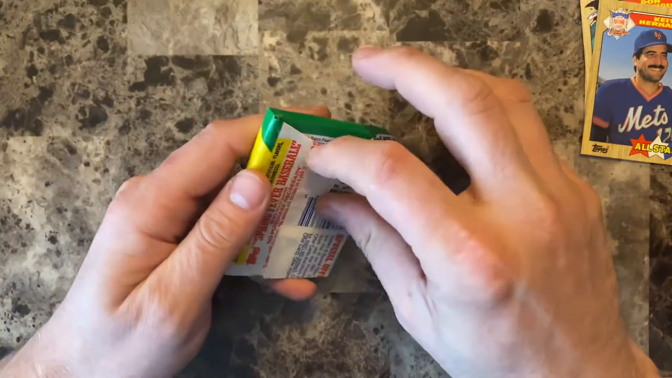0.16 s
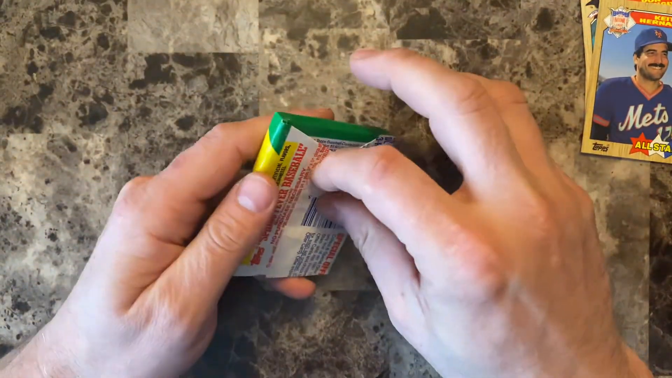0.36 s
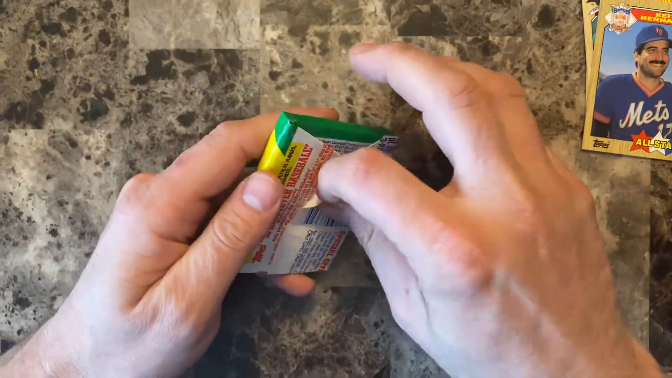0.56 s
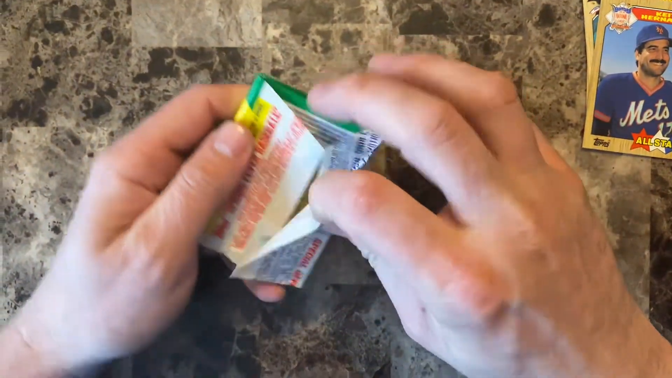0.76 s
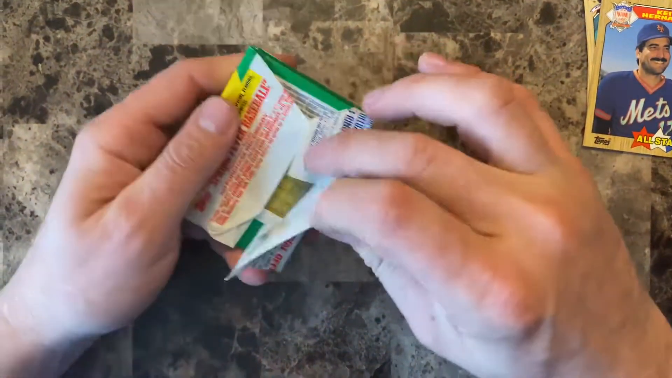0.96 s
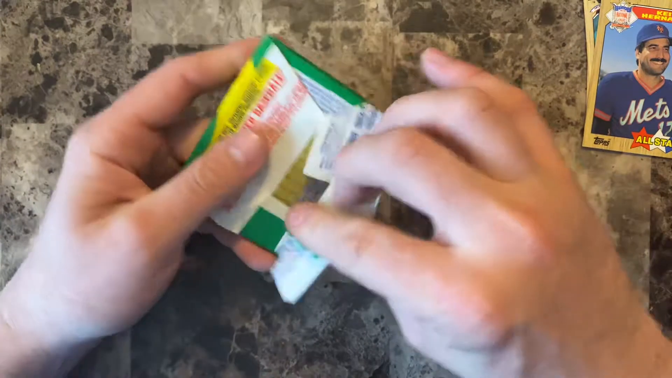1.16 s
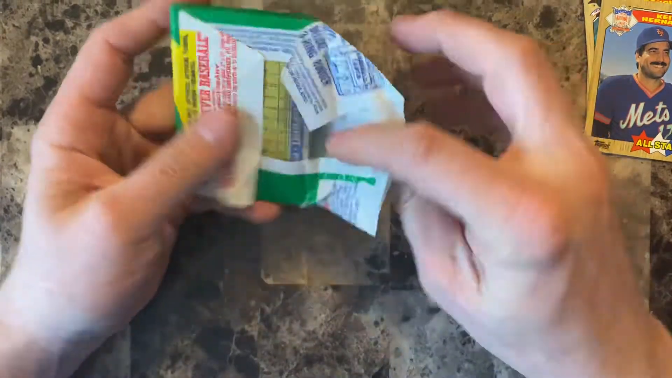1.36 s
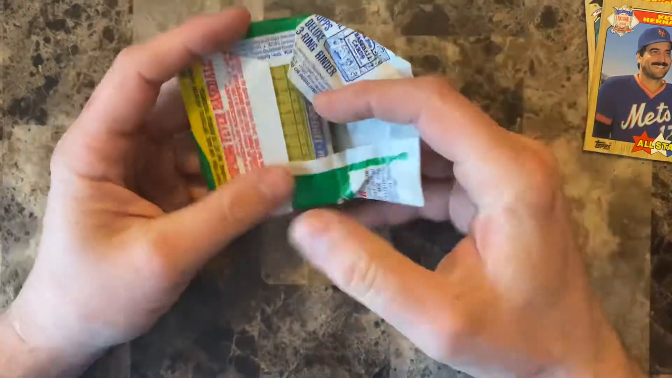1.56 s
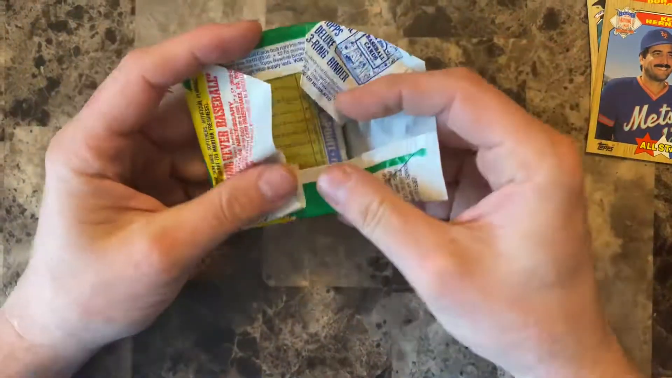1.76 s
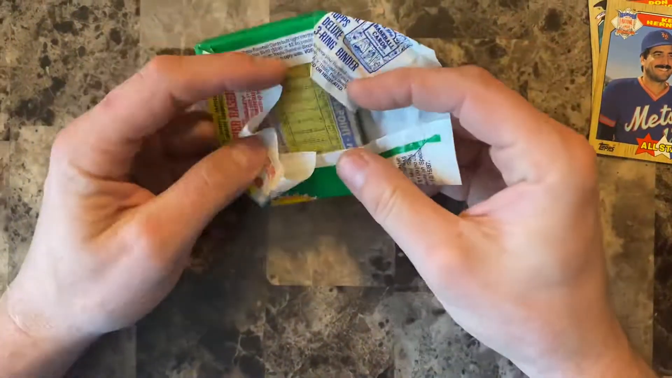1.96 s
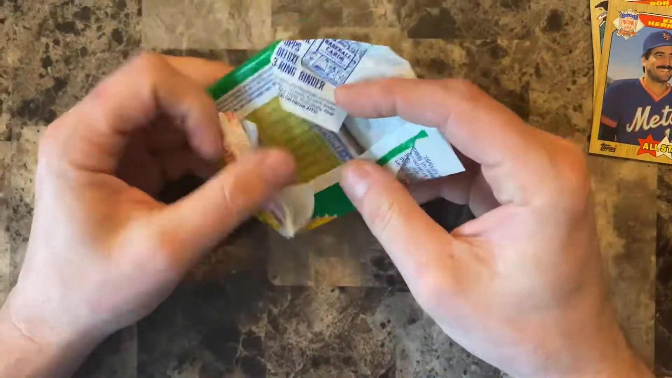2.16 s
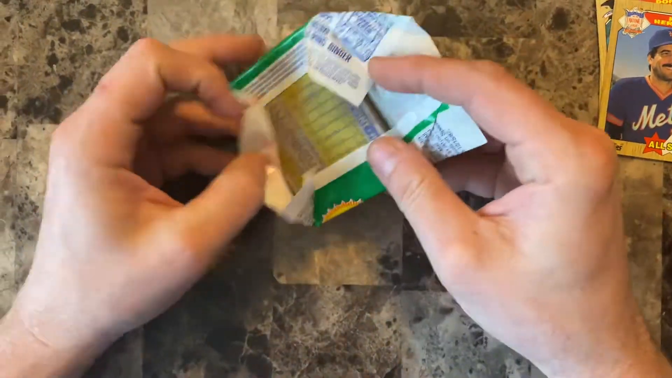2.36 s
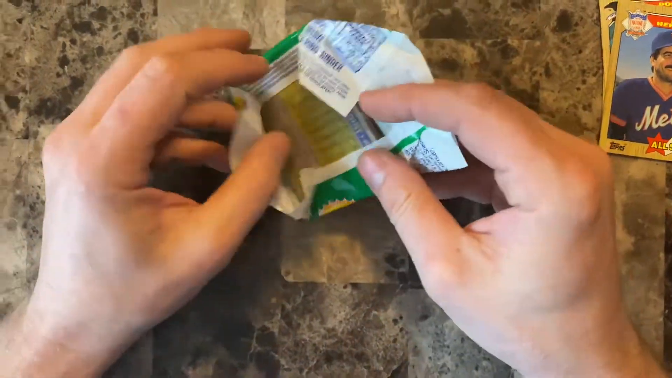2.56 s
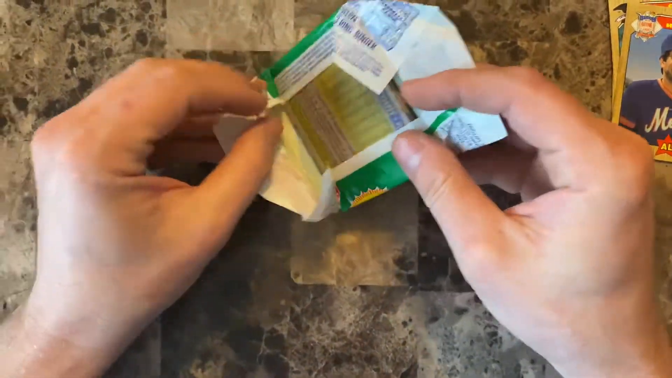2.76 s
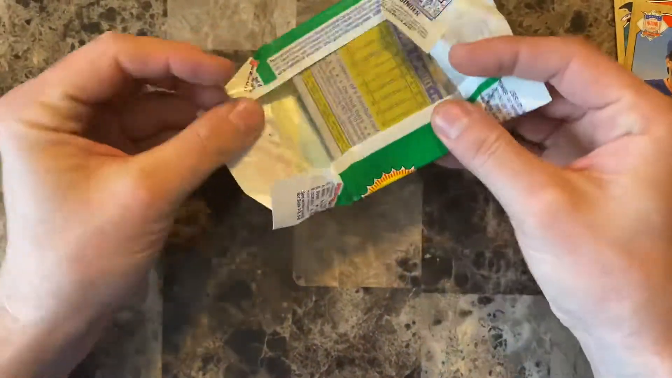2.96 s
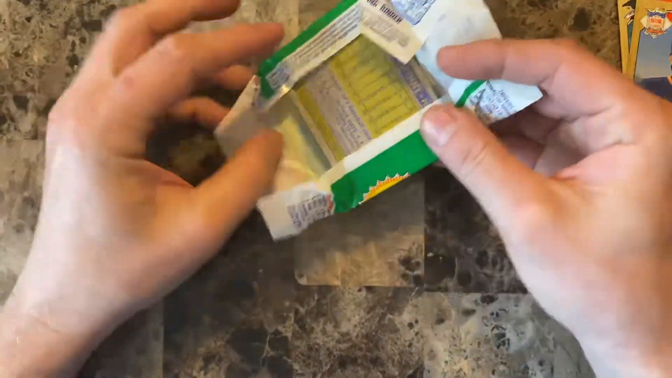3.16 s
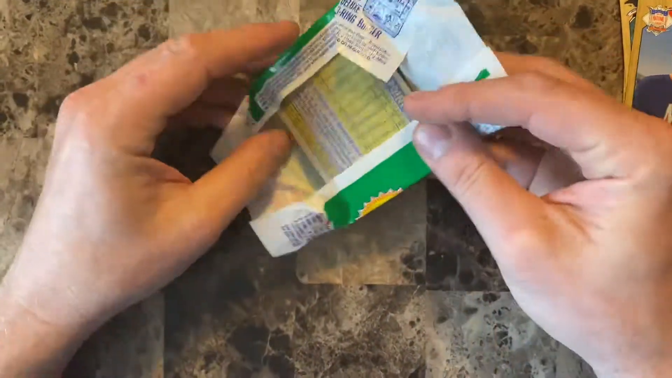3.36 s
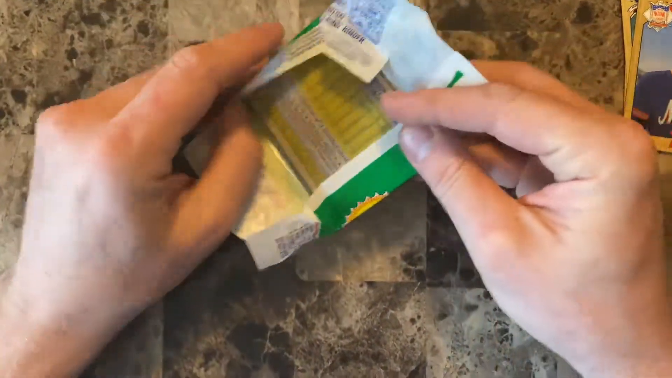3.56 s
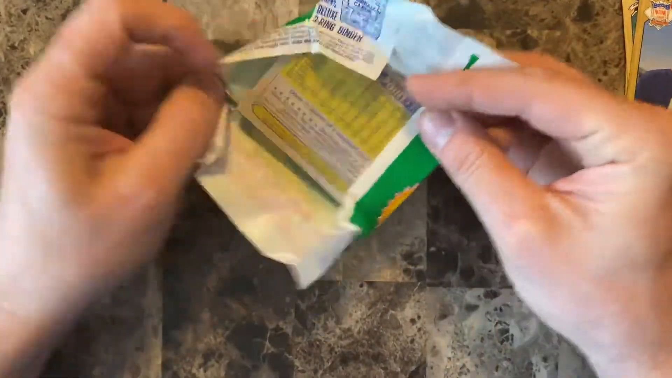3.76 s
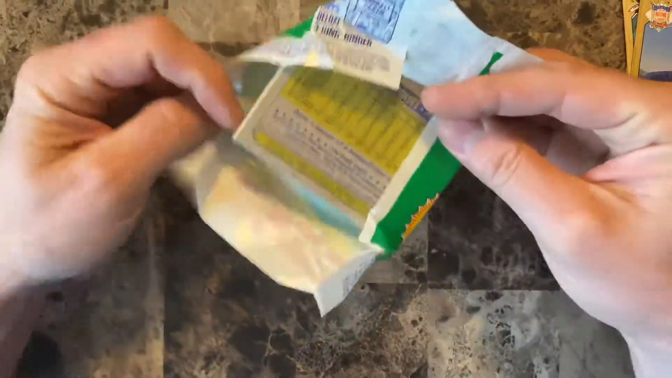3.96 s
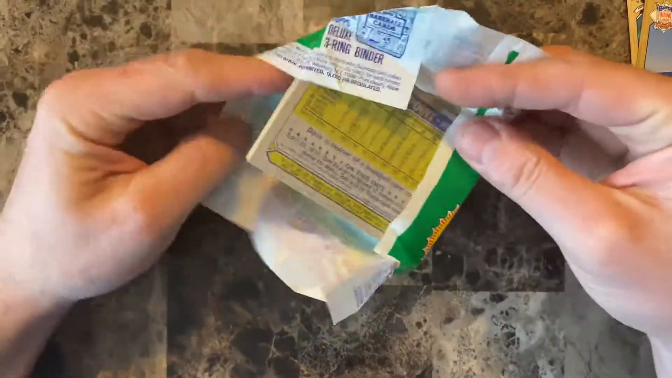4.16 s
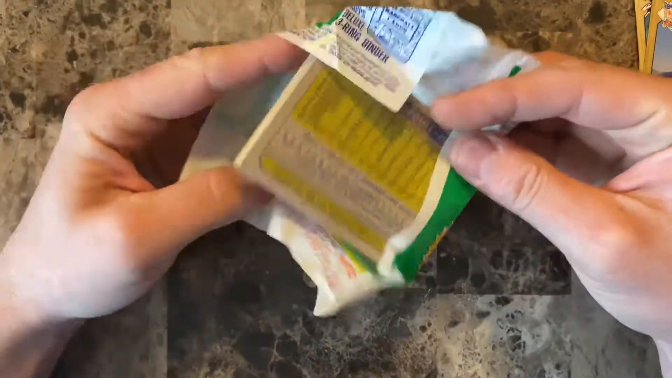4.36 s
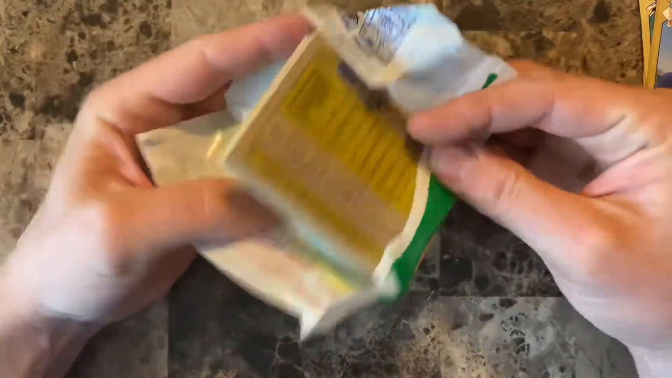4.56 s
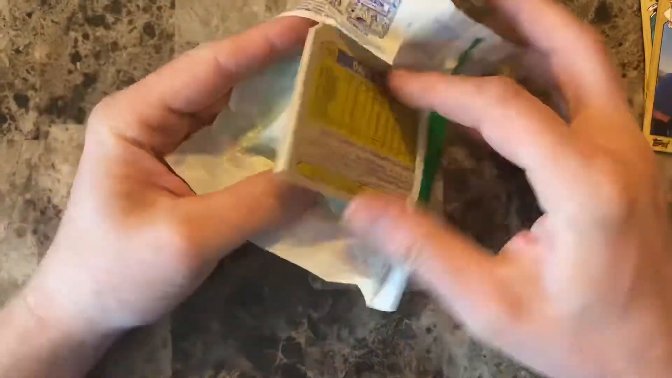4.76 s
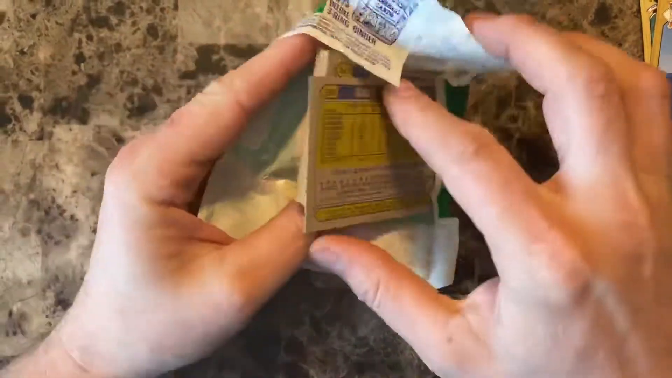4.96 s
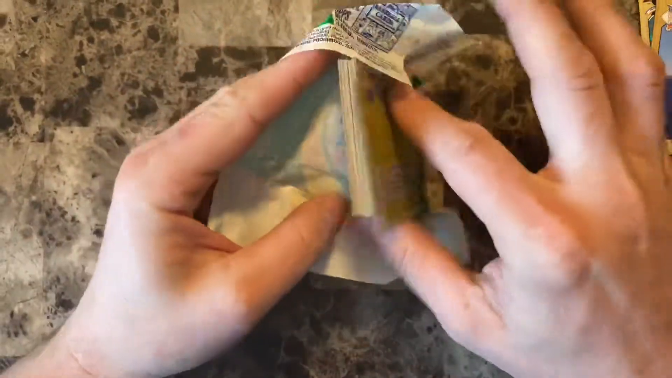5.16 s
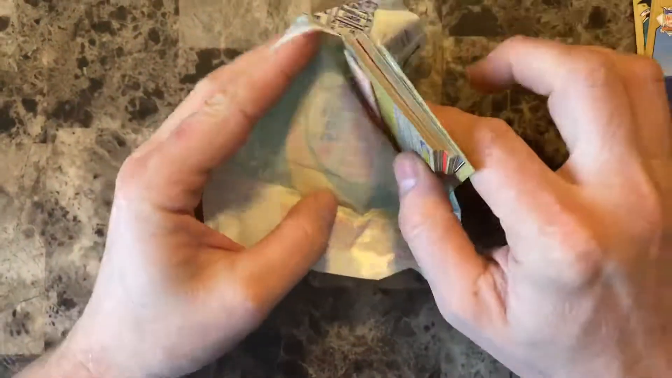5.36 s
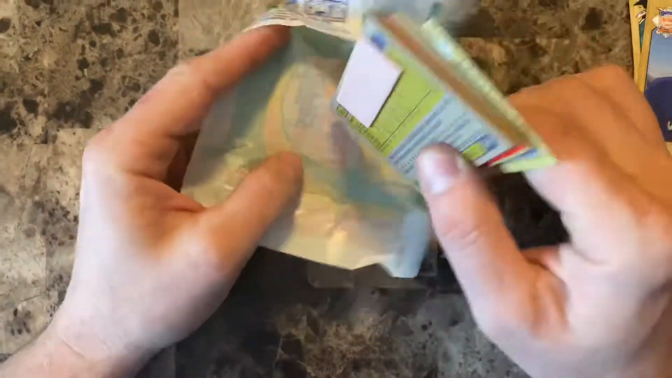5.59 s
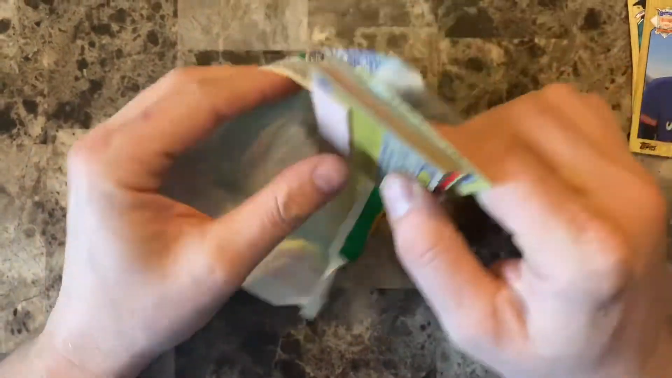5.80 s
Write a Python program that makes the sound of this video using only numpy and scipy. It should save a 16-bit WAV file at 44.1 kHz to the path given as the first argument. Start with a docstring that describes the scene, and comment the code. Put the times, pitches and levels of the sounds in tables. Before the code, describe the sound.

Waxed paper crackles close to the microphone as fingers unfold it from a stack of cards. It starts with sparse little clicks, then comes in irregular flurries of crisp snaps and rustling, with a few hollow pops as the wrapper flexes. Later, soft low bumps on the table sit under the crinkling. The room is quiet and dry, with an appliance humming faintly far away.

```python
"""Sharp snaps and a crackling rustle: hands unfold and crinkle a waxed paper wrapper around a stack of cards.
Each snap is a crease buckling and ringing a panel of paper; many tiny buckles merge into the rustle.
The whole wrapper flexes with hollow pops, a hand thuds softly on the table, an appliance drones far off.
A phone hears it close by in a quiet room, through two ports whose phase gap grows with pitch."""
import sys
import numpy as np
from scipy import signal
from scipy.fft import rfft, irfft, next_fast_len
from scipy.io import wavfile
from scipy.ndimage import uniform_filter1d

SR = 44100
rng = np.random.default_rng(int(sys.argv[2]) if len(sys.argv) > 2 else 0)


def inscribe(sig):
    """Save sig as 16-bit PCM at rate SR to the path in sys.argv[1].

    A 1-D sig is mono; a 2-D sig holds one channel per row.
    Samples are clipped to [-1, 1] before scaling.
    """
    pcm = np.round(np.clip(np.atleast_2d(sig).T, -1, 1) * 32767)
    wavfile.write(sys.argv[1], SR, pcm.astype(np.int16))


N = 257102

# spectrum radiated by a crease edge: frequency_hz, relative_db
EDGE_SPECTRUM = [(1200, -80), (2500, -28.5), (4000, -6.5), (4800, 3.5), (5500, 5), (7000, -1.5),
                 (9000, -2.5), (12000, -7.5), (16000, -15.5)]


def crease_snaps():
    """Snap-through buckling: a brief noise burst rings the flipping panel and radiates from the crease."""
    # buckling creases: time_s, panel_hz, panel_db, edge_db
    creases = [(0.046, 1790, -48, -49), (0.326, 2540, -50.5, -52), (0.368, 1730, -39.5, -31.5),
               (0.446, 1210, -61, -40), (0.583, 2000, -54, -40.5), (0.618, 3100, -63, -28),
               (0.629, 3800, -57, -23.5), (0.638, 2040, -31, -29), (0.7, 2560, -39, -27),
               (0.714, 1100, -39, -35), (0.719, 1170, -36, -24.5), (0.748, 1800, -46, -45),
               (0.76, 1820.0, -36, -31), (0.774, 1670, -28.5, -27), (0.79, 1840, -33, -29.5),
               (0.802, 1250, -43, -33), (0.816, 910, -39.5, -30.5), (0.834, 3200.0, -65, -27.5),
               (0.848, 2940.0, -57, -30.5), (0.918, 1170, -36.5, -37.5), (1.105, 1060, -35, -39.5),
               (1.141, 1620, -28, -23.5), (1.167, 3830, -23, -32), (1.206, 1370, -31.5, -26),
               (1.215, 1650, -26, -17), (1.227, 1500, -25.5, -16.5), (1.249, 1680.0, -39, -32),
               (1.257, 1520, -23.5, -30), (1.362, 826, -37.5, -45), (1.369, 945, -40, -60),
               (1.403, 850, -38, -38), (1.411, 1950, -34, -26.5), (1.453, 2280.0, -46, -43),
               (1.474, 1270, -37, -30.5), (1.495, 1180, -34, -60), (1.533, 1440, -30, -28),
               (1.583, 1800, -37, -46), (1.599, 1370, -36.5, -38), (1.656, 3290.0, -40, -34.5),
               (1.668, 1300, -37, -51), (1.705, 3000, -39.5, -32), (1.708, 3860, -30, -27.5),
               (1.907, 2430, -34, -34), (1.996, 2570, -31.5, -31), (2.028, 1970, -38, -41),
               (2.092, 1370, -34, -30), (2.145, 1870, -35, -33.5), (2.181, 3490.0, -41, -31.5),
               (2.2, 1310, -35.5, -31), (2.234, 1940, -33, -35), (2.257, 2570, -40, -38),
               (2.261, 1740, -26.5, -28), (2.282, 1890, -28.5, -56), (2.313, 1400, -32, -64),
               (2.362, 1820, -30.5, -30.5), (2.548, 1790, -34, -50), (2.594, 1090, -43, -46),
               (2.564, 1830, -32.5, -36.5), (2.573, 2180, -35, -29), (2.736, 2300, -28, -32),
               (2.758, 2390, -32, -36), (2.781, 2500, -19.5, -24.5), (2.79, 1730, -28, -24.5),
               (2.85, 2010, -33, -57), (2.859, 1520, -30, -58), (2.878, 1930, -27, -47),
               (2.892, 1100, -24.5, -25.5), (2.914, 1940, -31, -31), (2.985, 1350, -32, -34),
               (3.012, 1660, -26.5, -35.5), (3.02, 1500, -30.5, -50), (3.033, 1530, -44, -48),
               (3.056, 1300, -37, -37), (3.147, 1820, -36, -36), (3.211, 1770, -37, -67),
               (3.311, 2070, -32.5, -44), (3.482, 2600, -38, -49), (3.49, 1450, -32.5, -76),
               (3.517, 1490, -32, -83), (3.537, 1400, -38, -57), (3.548, 2100.0, -31, -43),
               (3.557, 2650.0, -36, -29.5), (3.566, 1540, -31, -59), (3.579, 2300, -32, -40),
               (3.582, 1480, -15.5, -18), (3.65, 2200, -34, -41), (3.656, 1500, -33, -48),
               (3.663, 2520, -37, -41), (3.668, 1390, -33.5, -32.5), (3.674, 1500, -30, -46),
               (3.708, 1630, -31, -29), (3.714, 2220, -29, -23), (3.728, 1410, -28.5, -28),
               (3.733, 1380, -28, -32.5), (3.749, 2180, -34, -45), (3.754, 2080, -29.5, -49),
               (3.76, 1010, -24.5, -26), (3.772, 1540, -24.5, -28.5), (3.803, 1120, -32, -36),
               (3.815, 1260, -40, -35), (3.834, 1400, -35.5, -41), (3.856, 1300, -36, -46),
               (3.865, 1390, -35.5, -34), (3.877, 900, -30.5, -54), (3.915, 1200, -25, -23),
               (3.943, 950, -24, -67), (3.995, 1550, -24.5, -31.5), (4.01, 2050, -24.5, -58),
               (4.11, 1440, -31.5, -67), (4.148, 1820, -28, -40), (4.216, 1500, -31, -27),
               (4.22, 2010, -27, -22), (4.24, 1480, -35.5, -34.5), (4.292, 1510, -40, -40),
               (4.324, 1650, -32.5, -38), (4.334, 2300, -34, -31), (4.343, 1820, -25.5, -36),
               (4.389, 1890, -23, -25.5), (4.431, 925, -30.5, -70), (4.518, 1700, -20.5, -21),
               (4.528, 2060.0, -26, -31), (4.593, 2600, -30, -35), (4.604, 990, -31, -37),
               (4.617, 1330, -29, -41), (4.63, 1630, -23.5, -25), (4.636, 3280, -23.5, -19),
               (4.656, 2470, -32.5, -30), (4.789, 2050.0, -36.5, -32), (4.821, 3250, -33, -35),
               (4.832, 1990, -30, -29), (5.025, 1720, -33, -34), (5.035, 1570, -31, -39),
               (5.064, 2200, -43, -32.5), (5.094, 3420, -35.5, -49), (5.071, 2070, -36, -34),
               (5.176, 1490, -29, -40), (5.181, 2570, -30.5, -27), (5.194, 1890, -32, -51),
               (5.212, 1310, -29, -58), (5.246, 3110, -18.5, -61), (5.272, 1500, -34.5, -39),
               (5.392, 2100, -26.5, -28), (5.4, 2050, -22, -27), (5.411, 1730, -30, -58),
               (5.465, 2030, -26, -29), (5.479, 3570, -44, -24.5), (5.489, 1630, -28, -41),
               (5.5, 1400, -31, -43), (5.517, 1940, -32, -40), (5.543, 1700, -27.5, -45),
               (5.561, 2220.0, -34, -27.5), (5.57, 2010.0, -32, -48), (5.584, 1760, -31.5, -35),
               (5.295, 1400, -37.5, -55), (5.739, 2400, -41, -43), (5.765, 1720, -25.5, -25)]
    time_s, panel_hz, panel_db, edge_db = np.transpose(creases)[..., None]
    flip_s, swell_over_decay, jolt = .004, 0.42, 3.04
    bending_rad_per_root_hz = 0.7156
    t, hz = np.arange(1024) / SR, np.fft.rfftfreq(1024, 1 / SR)
    force = rng.standard_normal((len(time_s), 2, len(t)))
    force[..., round(flip_s * SR)] += jolt * np.sign(force[..., 0])  # the impulse of the flip
    slowness = np.exp(rng.normal(0, 0.18, (len(time_s), 1, 1)))  # some creases give way more slowly
    # sharp creases sound broad and papery, blunt ones ring
    sharpness = amp(0.26 * (edge_db - panel_db).clip(max=0))
    broad = resonance(hz, panel_hz, 2.1 * panel_hz) ** 2
    panel = broad * (sharpness + resonance(hz, panel_hz, 0.4 * panel_hz))
    # dispersion: bending waves bring the high part first
    panel *= np.exp(-1j * bending_rad_per_root_hz * (np.sqrt(hz) - hz / 100))
    edge = amp(along(EDGE_SPECTRUM, hz))
    samples = ((time_s - flip_s) * SR).astype(int) + np.arange(len(t))
    out = np.zeros((2, N + SR))
    for response, level_db, decay_s in [(panel[:, None], panel_db, .0013), (edge, edge_db, .001)]:
        tau_s = decay_s * slowness * np.where(t < flip_s, swell_over_decay, 1)
        burst = force * np.exp(-abs(t - flip_s) / tau_s)
        wave = irfft(rfft(burst) * response)
        rms = np.sqrt(np.sum(wave[:, 0] ** 2, axis=1, keepdims=True) / 300)  # energy over 300 samples
        wave *= (amp(level_db) / rms)[..., None]
        out += [np.bincount(samples.ravel(), wave[:, k].ravel(), N + SR) for k in range(2)]
    return out[:, :N]


def rustle():
    """Source and filter: crackle excites bright crease edges and panels whose ring follows the hands."""
    # panel resonances, wide panel to small: pitch_hz
    panels_hz = [734, 951, 1101, 1560, 2290, 3190]
    ring_hz, panel_gain, edge_gain = hand_movements()
    edge_force = crackle(count=1600, spread_db=2.0, t60=0.009, hiss=0.7)
    out = edge_gain * unit(coloured(edge_force, EDGE_SPECTRUM))
    nearness = [np.exp(-(np.log(ring_hz / hz) / 0.3) ** 2) for hz in panels_hz]
    panel_force = crackle(count=1300, spread_db=3, t60=0.013, hiss=0.9)
    for hz, share in zip(panels_hz, nearness / np.sum(nearness, axis=0)):
        ring = filtered(panel_force, lambda f: resonance(f, hz, .55 * hz) ** 2)
        out += panel_gain * np.sqrt(share) * unit(ring)
    return out


def crackle(count, spread_db, t60, hiss):
    """Shot noise: small buckles at chance moments, a few larger than the rest, over sliding hiss."""
    when, rarity = rng.random((count, 2)).T
    sizes = amp(-spread_db * np.log(rarity + .02))
    impulses = np.bincount((when * N).astype(int), sizes, N)
    grain = strike_envelope(np.arange(SR // 20) / SR, t60, rise_s=.002)
    envelope = signal.fftconvolve(impulses, grain)[:N]
    return (hiss + unit(envelope)) * rng.standard_normal((2, N))


def hand_movements():
    """Incoherent addition: movements sum in power, and the strongest weighs most in the ring's pitch."""
    # movements that work the paper: start_s, length_s, ring_hz, panel_db, edge_db
    moves = [(0.00, 0.065, 900, -75, -61), (0.159, 0.034, 1210, -75, -59), (0.362, 0.33, 1310, -73, -56),
             (0.619, 0.049, 2510, -45.5, -46), (0.697, 0.14, 1640, -41.5, -40),
             (0.89, 0.06, 1490, -52.5, -50), (1.028, 0.086, 1580, -47, -48), (1.161, 0.017, 2000, -42, -42),
             (1.211, 0.065, 1890, -33, -35), (1.391, 0.033, 960, -44.5, -45.5),
             (1.45, 0.021, 1400, -41.5, -38), (1.51, 0.15, 1610, -50.5, -59),
             (1.695, 0.017, 1960, -42, -41), (1.73, 0.2, 2130, -50, -49.5),
             (2.018, 0.023, 2180, -39, -42.5), (2.117, 0.081, 1980, -41, -45.5),
             (2.226, 0.2, 1960, -42.5, -46.5), (2.505, 0.0076, 2350, -36.5, -41.5),
             (2.562, 0.053, 1870, -46.5, -53.5), (2.686, 0.12, 2060, -38.5, -45),
             (2.857, 0.039, 1660, -32, -41.5), (3.02, 0.029, 1670, -38.5, -41),
             (3.132, 0.062, 1600, -45, -51.5), (3.288, 0.062, 2000, -39.5, -47.5),
             (3.401, 0.11, 1830, -43.5, -54.5), (3.551, 0.049, 1840, -34, -44.5),
             (3.699, 0.059, 1770, -31, -37.5), (3.84, 0.13, 1100, -43, -50.5),
             (3.995, 0.011, 1840, -33.5, -39.5), (4.106, 0.32, 1760, -40, -46),
             (4.303, 0.11, 1740, -34.5, -40), (4.511, 0.15, 1730, -34.5, -38.5),
             (4.712, 0.17, 1540, -41.5, -45.5), (4.892, 0.019, 2170, -43.5, -53),
             (4.99, 0.089, 1550, -41.5, -46), (5.128, 0.02, 2200, -35.5, -35.5),
             (5.167, 0.18, 1900, -42, -48), (5.411, 0.17, 1950, -32.5, -40.5),
             (5.673, 0.13, 1820, -45.5, -50)]
    # the paper merely held: ring_hz, panel_db, edge_db
    held = (810, -97, -73)
    rise_db_per_s, fall_db_per_s, settle_s = 571, 408, 0.099
    t = np.arange(0, N + 64, 64) / SR
    start_s, length_s, ring_hz, panel_db, edge_db = np.transpose(moves)[..., None]
    before_s, after_s = (start_s - t).clip(0), (t - start_s - length_s).clip(0)
    # the fall slows as the paper creeps back
    drop_db = rise_db_per_s * before_s + fall_db_per_s * after_s / (1 + after_s / settle_s)
    panel, edge = amp(panel_db - drop_db) ** 2, amp(edge_db - drop_db) ** 2
    held_hz, held_panel, held_edge = held[0], amp(held[1]) ** 2, amp(held[2]) ** 2
    panel_power, edge_power = panel.sum(axis=0) + held_panel, edge.sum(axis=0) + held_edge
    mean_hz = (np.sum(panel * ring_hz, axis=0) + held_panel * held_hz) / panel_power
    curves = mean_hz, np.sqrt(panel_power), np.sqrt(edge_power)
    return [np.interp(np.arange(N) / SR, t, curve) for curve in curves]


def paper_colour(x):
    """Resonance: faint steady rings, likely the card stack's, each lift a narrow band of the paper."""
    # steady resonances: pitch_hz, width_hz, lift_db
    rings = [(1177, 30, 6), (1247, 11.4, 4.5), (1734, 83, 0.5), (2110, 114, 2.5), (4220, 40, 6.5)]
    lifts = lambda f: [1 + (amp(db) - 1) * resonance(f, hz, width_hz) for hz, width_hz, db in rings]
    return filtered(x, lambda f: np.prod(lifts(f), axis=0))


def wrapper_pops():
    """A heavily damped mode: the half-open wrapper flexes as a whole with a hollow pop."""
    # flexes of the wrapper: start_s, peak_db, pitch_hz
    flexes = [(0.719, -29, 716), (0.774, -31.5, 600), (0.816, -31.5, 850), (0.918, -38.5, 590),
              (1.217, -30, 510), (1.227, -25, 410), (2.146, -33.5, 510), (2.892, -23.5, 720),
              (3.581, -26.5, 494), (3.941, -23.5, 556), (4.145, -29, 625)]
    return damped_sines(flexes, t60=0.018, rise_s=0.00093)


def table_thuds():
    """Soft impact: a hand sets the table vibrating for a few low cycles."""
    # hand contacts: start_s, peak_db, pitch_hz
    thuds = [(3.739, -39, 97), (4.005, -39.5, 280), (4.44, -38.5, 119), (4.735, -35, 96),
             (5.02, -44.5, 283), (5.178, -37, 132)]
    return damped_sines(thuds, t60=0.097, rise_s=0.0026)


def room_reverb(x):
    """Diffuse field: fresh noise follows the sound's power, each frequency dying at its own rate."""
    # reverberation times: frequency_hz, t60_s
    decay_times = [(300, 0.024), (2000, 0.056), (10000, 0.027)]
    hz, t, spectrum = signal.stft(x, SR, nperseg=128)
    power = uniform_filter1d(abs(spectrum) ** 2, size=3, axis=0)
    fade = amp(-60 * t[:400] / along(decay_times, hz)[:, None]) ** 2
    power = signal.fftconvolve(power, fade / fade.sum(1, keepdims=True), axes=1)[:, :len(t)]
    noise = signal.stft(rng.standard_normal((2, N)), nperseg=128)[2]
    return signal.istft(unit(noise) * np.sqrt(abs(power)), nperseg=128)[1][:, :N]


def appliance_drone():
    """Narrow-band noise wavers like an unsteady tone: four such hums ride on a far appliance's rumble."""
    # rumble spectrum: frequency_hz, relative_db
    rumble = [(15, -63), (25, -24), (52, -6), (90, -0.5), (106, -8), (165, -3), (374, -13.5), (477, -15.5),
              (582, -14), (5000, -34), (6500, -79), (11000, -120)]
    # wavering hums: pitch_hz, width_hz, level_db
    hums = [(119.4, 4.8, -61.5), (157.9, 8.2, -58), (208, 4.1, -66), (485, 36, -61.5)]
    out = amp(db=-53.5) * unit(coloured(rng.standard_normal((2, N)), rumble))
    for hz, width_hz, db in hums:
        band = lambda f: 1 / (1 + (2 * (f - hz) / width_hz) ** 2)
        out += amp(db) * unit(filtered(rng.standard_normal((2, N)), band))
    return out


def port_pair(source):
    """Partial coherence: two noises mix as mid and side, so the ports' likeness depends on frequency."""
    # likeness of the two ports: frequency_hz, correlation
    coherence = [(100, .99), (600, .9), (1200, .98), (1800, .995), (2300, .9), (3200, .5), (5500, .88),
                 (15000, .95)]
    angle = lambda hz: np.arccos(along(coherence, hz)) / 2
    mid, side = filtered(source, lambda hz: np.array([np.cos(angle(hz)), np.sin(angle(hz))]))
    return np.array([mid + side, mid - side])


def damped_sines(events, t60, rise_s):
    """Free vibration: each event starts one decaying mode."""
    out, t = np.zeros(N + SR), np.arange(SR // 5) / SR
    envelope = strike_envelope(t, t60, rise_s)
    for start_s, db, hz in events:
        out[round(start_s * SR):][:len(t)] += amp(db) * envelope * np.sin(2 * np.pi * hz * t)
    return out[:N]


def strike_envelope(t, t60, rise_s):
    """Exponential decay with a soft onset and a peak of one."""
    shape = amp(-60 * t / t60) * (1 - np.exp(-t / rise_s))
    return shape / shape.max()


def resonance(hz, centre_hz, width_hz):
    """Band-pass response of a damped oscillator."""
    return 1j * hz * width_hz / (centre_hz ** 2 - hz ** 2 + 1j * hz * width_hz)


def coloured(x, points):
    """Spectral shaping by (frequency_hz, gain_db) points, closed at both ends."""
    closed = [(points[0][0] / 2, -90)] + list(points) + [(SR / 2, -90)]
    return filtered(x, lambda hz: amp(along(closed, hz)))


def filtered(x, response):
    """Linear filtering: the spectrum times a complex response."""
    size = next_fast_len(N + SR // 2)
    return irfft(rfft(x, size) * response(np.fft.rfftfreq(size, 1 / SR)), size)[..., :N]


def along(points, hz):
    """Interpolation of (frequency_hz, value) points on a log axis."""
    points_hz, values = np.transpose(points)
    return np.interp(np.log(hz + 1), np.log(points_hz + 1), values)


def amp(db):
    """Decibels to amplitude."""
    return 10 ** (np.asarray(db) / 20)


def unit(x):
    """Scaling to an rms of one."""
    return x / np.sqrt(np.mean(abs(x) ** 2) + 1e-20)


def scene():
    """Superposition: paper, room and drone differ between the ports; pops and thuds are common to both."""
    paper = paper_colour(crease_snaps() + rustle())
    reverb = amp(-7.5) * room_reverb(paper[0])
    return port_pair(paper + reverb + appliance_drone()) + wrapper_pops() + table_thuds()


def record(dry):
    """Saturation rounds the peaks; the phone's response adds a dip, port gaps and a band limit."""
    # phase gap between the ports: frequency_hz, left_lead_rad
    phase_gap = [(200, 0), (650, -.3), (1800, 0), (2700, 1.1), (3800, .9), (4800, 3.6), (5350, 6.3),
                 (6000, 7.05), (9000, 8.2), (12500, 9.15), (14500, 9.42)]
    # level gap between the ports: frequency_hz, left_minus_right_db
    level_gap = [(1700, 0), (2300, -0.5), (4800, -5), (5400, 2), (6500, 0)]
    ceiling, dip_hz, top_hz = .85, 2900, 16500
    rounded = dry / (1 + abs(dry / ceiling) ** 4) ** (1 / 4)
    half = np.array([[.5], [-.5]])  # each port takes half the gap
    body = lambda hz: amp(-3 * np.exp(-(np.log((hz + 1) / dip_hz) / 1.1) ** 2))
    ports = lambda hz: amp(half * along(level_gap, hz)) * np.exp(1j * half * along(phase_gap, hz))
    return filtered(rounded, lambda hz: body(hz) * ports(hz) * (hz < top_hz))


dry = scene()
out = record(dry)
inscribe(out)
```